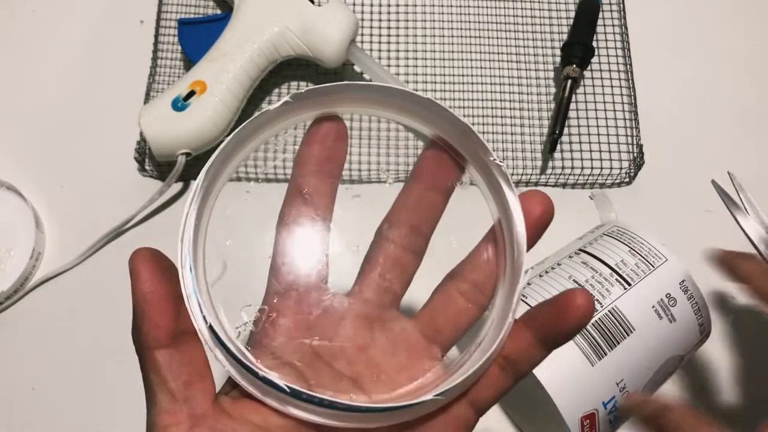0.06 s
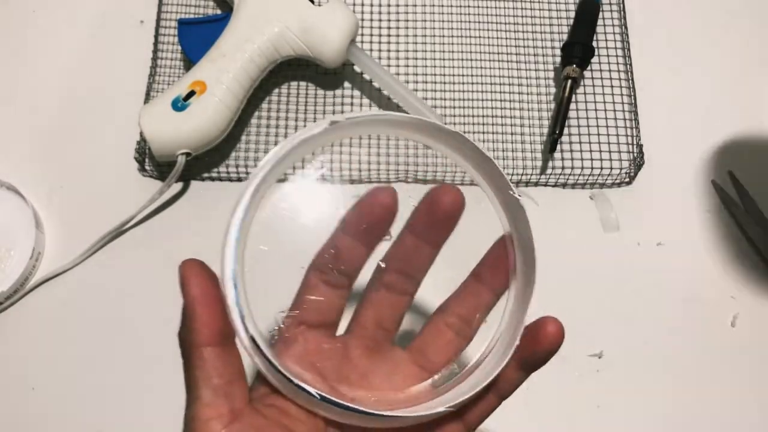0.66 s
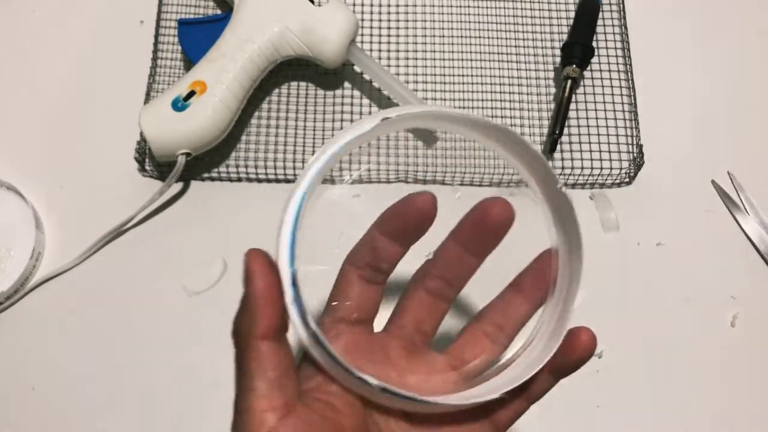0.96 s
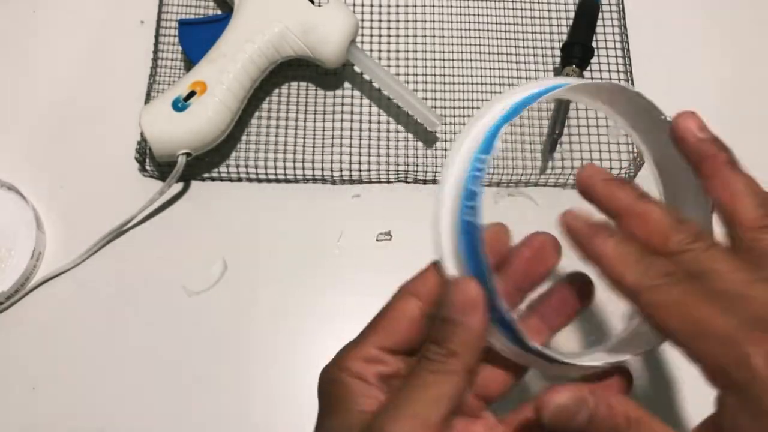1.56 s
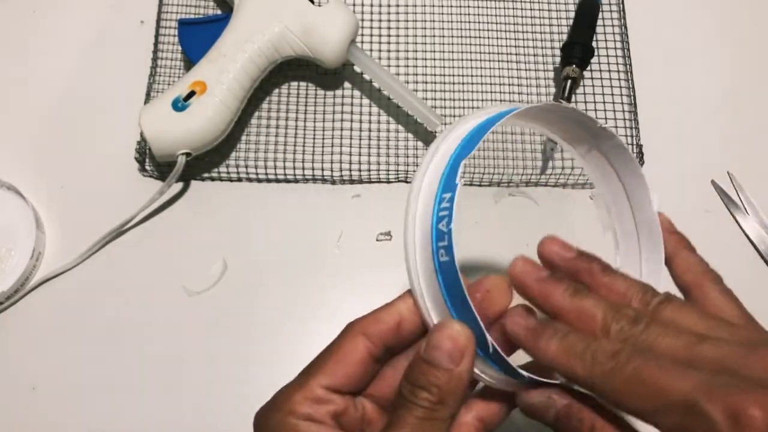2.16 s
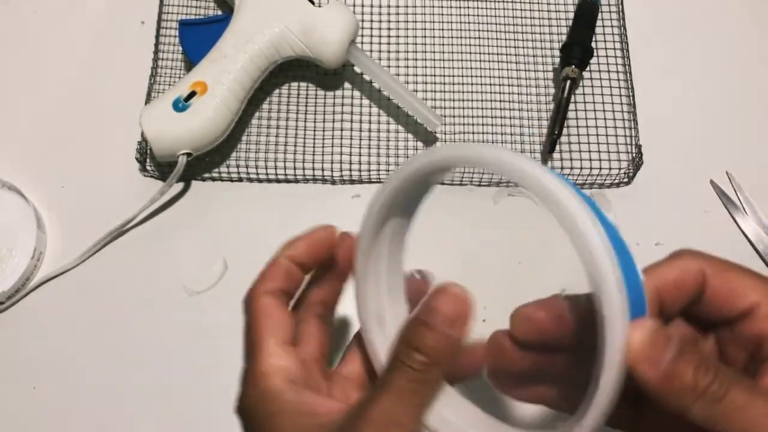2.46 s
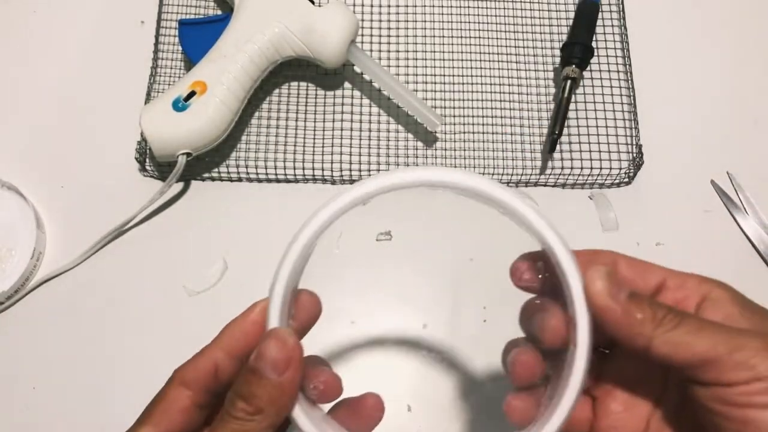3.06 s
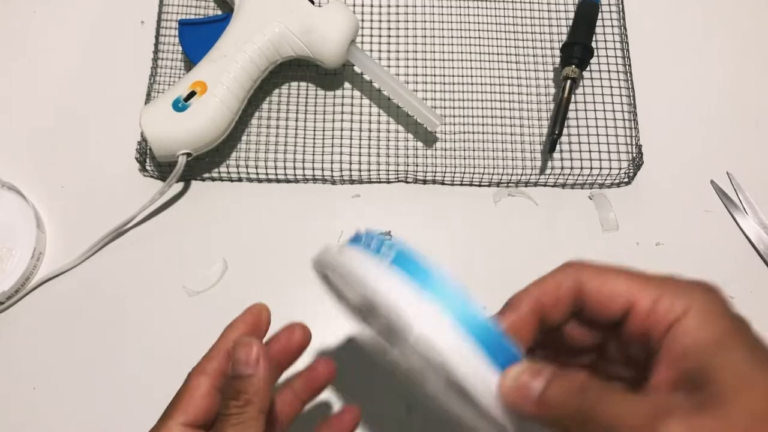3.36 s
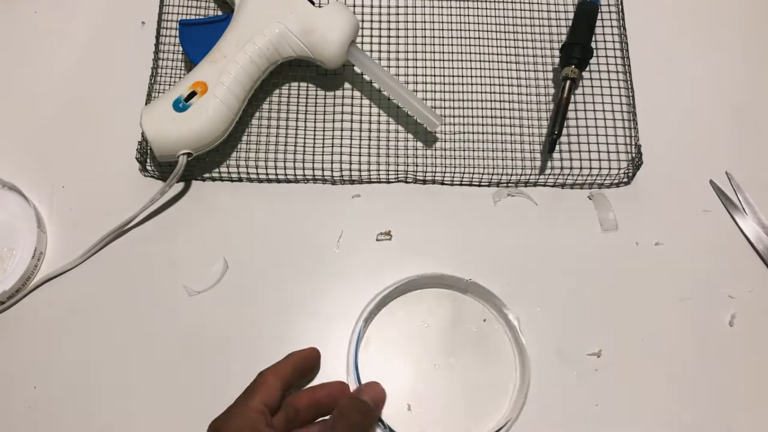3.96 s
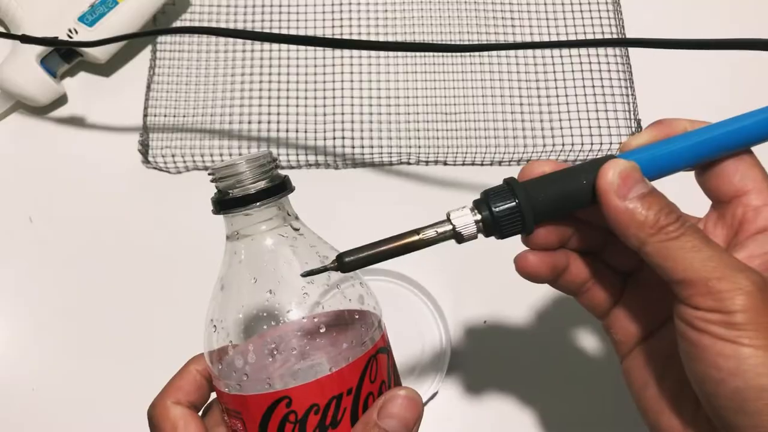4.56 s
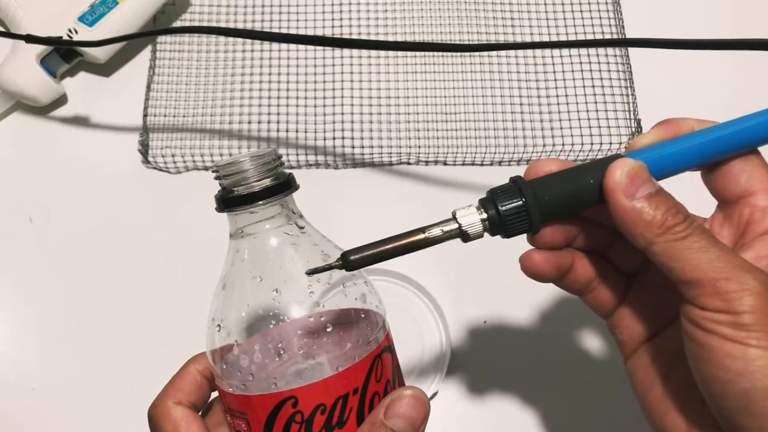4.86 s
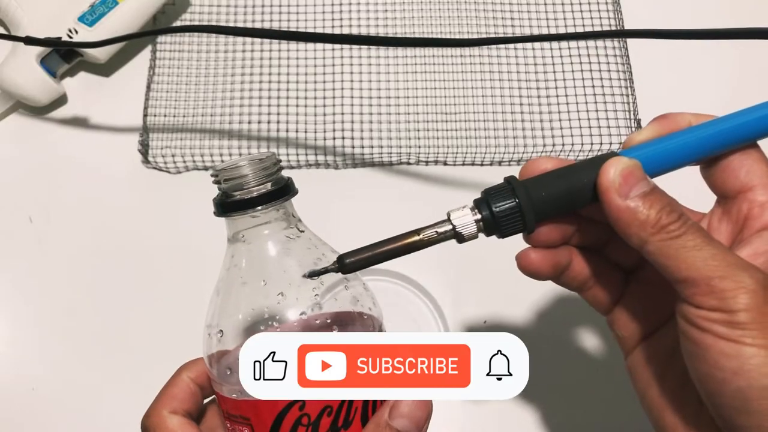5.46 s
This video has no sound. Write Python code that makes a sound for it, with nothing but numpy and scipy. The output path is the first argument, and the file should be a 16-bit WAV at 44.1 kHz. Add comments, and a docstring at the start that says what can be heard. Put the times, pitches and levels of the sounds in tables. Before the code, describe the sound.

A paper label slides over a table with a few soft rustles in the first half second. Just before 1 second, the film stretched across the rim of a plastic tub snaps with a hollow pop, like a small drum quickly damped, and crinkles faintly. From about 1.3 to 2.8 seconds, fingers rub unevenly around the stiff ring, with hissy strokes, light ticks and small knocks, the clearest near 2.4 seconds, followed by a tiny chirp of skin. A few more strokes come around 3.3 seconds. At 3.7 seconds the ring lands on the table with a sharp rocking clack, the loudest sound, then a softer clack at 4 seconds. Faint ticks follow until about 5 seconds. The microphone is close, in a small room with short reverberation, soft air noise, mains hum and a thin whine that grows slightly near 4.4 seconds.

```python
"""A table in a small room, one microphone close to hands working on the cut-off rim of a plastic tub.
A paper label slides aside, rustling. The clear film stretched across the rim snaps and rings like a
small drum: a hollow pop. Fingers rub and click round the rim, exciting its stiff modes, then the ring
is set down with two rocking clacks. Behind: short reverberation, air, mains hum and a faint whine."""
import sys
import numpy as np
from scipy import signal
from scipy.fft import rfft, irfft
from scipy.io import wavfile

SR = 44100
rng = np.random.default_rng(int(sys.argv[2]) if len(sys.argv) > 2 else 0)


def store_wav(level_fs):
    """Save 16-bit WAV to argv[1]."""
    pcm = np.round(np.clip(np.atleast_2d(level_fs), -1, 1) * 32767)
    wavfile.write(sys.argv[1], SR, pcm.T.astype(np.int16))


N = 247385
TIME = np.arange(N) / SR
POP_S = 0.9526

# modes of the stiff rim: f/Hz, relative level/dB, t60/s before the fingers damp them
RIM_MODES = [(923, 4, 0.006), (1051, -1, 0.039), (1183, -8.5, 0.045), (1617, 2, 0.011), (1830, -6, 0.026),
             (1945, -2, 0.0088), (2394, 2.5, 0.0094), (2640, 1.5, 0.006), (2893, -3, 0.02),
             (3357, -2, 0.011), (3860, 1.5, 0.0044), (4290, -3.5, 0.015), (4665, 0.5, 0.0067),
             (5860, 1, 0.0058), (7150, -2, 0.0078), (8540, 4, 0.0024), (9450, -9, 0.005),
             (12200, -21, 0.0056)]
# the ring lands on one edge and rocks onto the other:
# t/s, level/dB, centre f/Hz, skid/s, rocking time/s, other edge level/dB
LANDINGS = [(3.6824, -17.5, 1780, 0.001, .0023, -33.5), (4.0185, -29.5, 2480, 0.011, .0055, -37)]
# low modes of the whole ring on the table: f/Hz, level for an average landing/dB, t60/s
RING_MODES = [(175, -49, 0.057), (345, -37.5, 0.031), (456, -30, .02), (598, -36.5, 0.022)]
# fingers knock and flex the held ring: t/s, click level/dB, click f/Hz, flex level/dB, flex f/Hz
KNOCKS = [(1.373, -51, 3100, -36, 370), (1.5684, -42, 1230, -33.5, 410), (1.732, -44.5, 1300, -53, 356),
          (2.366, -43.5, 4960, -42, 197), (2.4427, -31, 2490, -34, 484), (2.534, -43.5, 3250, -41, 536)]
# light ticks on plastic, the last ones faint and high: t/s, level/dB, centre f/Hz
PLASTIC_TICKS = [(1.037, -47, 2030), (1.07, -47.5, 1970), (1.385, -58, 1510), (1.589, -41, 4170),
                 (1.755, -45, 4440), (2.2837, -39.5, 4840), (2.307, -47.5, 1710), (2.383, -45, 3400),
                 (2.398, -45.5, 2820), (2.597, -47.5, 2480), (3.2659, -46, 4260), (3.556, -54.5, 3030),
                 (3.61, -45.5, 3300), (4.2624, -53.5, 4900), (4.35, -59.5, 4740), (4.925, -62.5, 8200),
                 (5.0504, -58.5, 8200)]
# sticking skin lets go and the rim chirps at one pitch: t/s, level/dB, skid/s
SKIN_CHIRPS = [(2.484, -38.5, .008), (3.9196, -40.5, 0.00064)]
# drum modes of the stretched film: f/Hz, level/dB, t60/s
FILM_MODES = [(138, -50.5, 0.44), (168, -35, 0.16), (252, -38.5, 0.57), (304, -39.5, 0.9),
              (363, -41.5, 0.69), (422, -29, 0.11), (464, -36, 0.33), (510, -27.5, 0.4)]
# fingers travelling round the rim, one list a turn: t/s, relative level/dB
RUB_TURNS = [
    [(1.15, -87), (1.35, -58), (1.482, -59.5), (1.692, -63), (1.766, -58.5), (1.99, -66.5), (2.1, -69)],
    [(2.1, -85), (2.248, -62.5), (2.404, -61.5), (2.604, -61.5), (2.748, -66.5), (2.88, -94)],
    [(3.18, -78), (3.45, -93)],
]
# spectrum of skin rubbing on plastic: f/Hz, gain/dB
RUB_COLOUR = [(590, -3.5), (1000, -5.5), (1400, -12.5), (2150, -10), (2810, 4.5), (4310, -4.5), (4620, -6),
              (6040, -3), (7100, -7.5), (14200, -17), (16000, -20)]
# broad hollows that colour all rubbing on the ring: f/Hz, width/Hz, mean gain/dB
HOLLOWS = [(1535, 310, 12.5), (2610, 520, -6), (4000, 500, -1), (5800, 1700, -16)]
# short strokes of skin: peak t/s, length/s, hiss level/dB, hiss f/Hz, bowed flex level/dB
STROKES = [(1.396, 0.015, -51.5, 1650, -76), (1.533, .025, -52.5, 4380, -66),
           (1.74, 0.04, -50.5, 4000, -63), (1.87, 0.022, -57, 4070, -77), (2.211, 0.02, -59.5, 4450, -68),
           (2.288, 0.016, -48.5, 4750, -67), (2.719, 0.027, -57.5, 6200, -71),
           (2.761, 0.016, -48, 4200, -58.5), (3.274, 0.027, -47.5, 4000, -57.5),
           (3.324, 0.018, -56, 2300, -63), (3.363, 0.015, -51, 4000, -71), (3.634, .025, -48.5, 3050, -66),
           (3.966, 0.022, -61, 2770, -65), (4.375, 0.0052, -58, 4740, -84)]
# the label slides on the table: peak t/s, fall/s, rustle level/dB, rustle f/Hz, drone level/dB, f/Hz
LABEL_SLIDES = [(.005, 0.081, -48.5, 1500, -55.5, 300), (.265, 0.12, -65, 3900, -57.5, 480),
                (0.429, 0.043, -55, 2570, -68, 550)]
# decay of the room's tail: f/Hz, t60/s
ROOM_T60 = [(150, 0.85), (500, 0.59), (1500, 0.55), (4000, 0.53), (8000, 0.24), (16000, 0.64)]
# colour of the room's reflections: f/Hz, gain/dB
ROOM_COLOUR = [(100, 5.5), (400, 7.5), (1000, 2.5), (2500, -4.5), (5000, -3), (9000, -4), (16000, -20)]
# air of the still room: f/Hz, relative level/dB
AIR_COLOUR = [(15, -50), (25, -32), (49, -1), (117, -2.5), (149, -5), (236, -10), (309, -9), (344, -10.5),
              (531, -17.5), (1020, -15), (2610, -24), (2990, -23), (3430, -26), (5880, -32), (16000, -47)]
# mains hum and faint steady bands above it: f/Hz, width/Hz, level/dB
ROOM_TONES = [(123.5, 2.4, -70.5), (1094, 280, -79.5), (3044, 230, -77.5), (4870, 100, -86.5),
              (5960, 1000, -81.5)]
# a thin whine that grows stronger late on: t/s, level/dB
WHINE_LEVELS = [(0, -75), (4.38, -79), (4.46, -72.5), (5.6, -76)]


def rim_clicks(shell_db=-2, shell_t60=0.038, crack_db=-14, crack_t60=0.0058, held_t60=0.03):
    """Each push and skid rings the finger-damped rim; gives the sound at the microphone and all round."""
    near, radiated, t = np.zeros(N), np.zeros(N), TIME[:SR // 12]
    push = signal.unit_impulse(len(t))
    modes = sum((-1) ** k * mode(t, hz, db, min(t60, held_t60))
                for k, (hz, db, t60) in enumerate(RIM_MODES))
    for s, db, edges, skid_s in contacts():
        skid, shell, crack = rng.standard_normal((3, len(t)))
        force = push + unit_energy(skid * np.exp(-t / skid_s))
        ringing = unit_energy(signal.fftconvolve(force, modes)[:len(t)])
        # between the clear modes lie many crowded, quickly damped ones
        body = ringing + from_db(shell_db) * unit_energy(shell * dying(t, shell_t60))
        # hard plastic cracks in the treble, the more so the harder the blow
        snap = from_db(crack_db + 0.24 * db) * unit_energy(band(crack * dying(t, crack_t60), 6900, 14200))
        size = from_db(db) * np.sqrt(0.004 * SR)   # level counts as energy spread over 4 ms
        add(near, s, size * (unit_energy(band(body, *edges)) + snap))
        # summed over all directions, the peaks of the modes even out
        add(radiated, s, size * (unit_energy(band(push, *edges)) + snap))
    return near, radiated


def contacts(catches_per_s=22, catch_hz=3620, tick_octaves=1.94, tick_skid_s=0.0055):
    """Every contact that rings the plastic: t/s, level/dB, band edges/Hz, skid/s."""
    yield POP_S - 0.0084, -30, around(4170, 1.8), 0.005   # the film tears loose,
    yield POP_S - 0.002, -30, around(6200, 0.89), 0.0043   # snaps
    yield POP_S, -28, around(2800, 3.8), 0.0059   # and slaps the rim
    for s, db, hz, skid_s, rock_s, other_db in LANDINGS:
        yield s, db, around(hz, 1.73), skid_s   # one edge lands,
        yield s + rock_s, other_db, around(2440, 2.9), 0.0018   # the other follows,
        yield s + 0.013, -37.5, around(1110, 2.9), 0.021   # the ring shuffles to rest
    for s, db, hz, _, _ in KNOCKS:
        yield s, db, around(hz, 2.4), 0.0014
    for s, db, hz in PLASTIC_TICKS:
        yield s, db, around(hz, tick_octaves), tick_skid_s
    for s, db, skid_s in SKIN_CHIRPS:
        yield s, db, around(2840, 0.44), skid_s
    # a sliding finger catches at random, louder the harder it rubs
    pressure = rub_pressure()
    for i in np.flatnonzero((rng.random(N) < catches_per_s / SR) & (pressure > 0)):
        size, pitch = rng.uniform(-1, 1, 2)
        db = 20 * np.log10(pressure[i]) - 2.5 + 2 * size
        yield i / SR, db, around(catch_hz * 2 ** pitch, tick_octaves), tick_skid_s


def ring_thuds(rise_s=0.00041, flex_lag_s=0.00094, flex_cycles=7.4):
    """The ring flexes against hand or table and is damped at once."""
    out, t = np.zeros(N), TIME[:SR // 5]
    onset = 1 - np.exp(-t / rise_s)
    for s, _, _, db, hz in KNOCKS:
        add(out, s + flex_lag_s, onset * mode(t, hz, db, flex_cycles / hz))
    body = onset * sum(mode(t, hz, db, t60) for hz, db, t60 in RING_MODES)
    average_db = np.mean([row[-1] for row in LANDINGS])
    for s, _, _, _, rock_s, other_db in LANDINGS:
        add(out, s + rock_s, from_db(0.97 * (other_db - average_db)) * body)
    return out


def film_pop(rise_s=0.00095, free_s=0.034, damped_t60=0.0086):
    """The film snaps through and its low modes ring until the fingers still it."""
    out, t = np.zeros(N), TIME[:SR // 2]
    envelope = (1 - np.exp(-t / rise_s)) * dying(np.maximum(t - free_s, 0), damped_t60)
    add(out, POP_S, envelope * sum(mode(t, hz, db, t60) for hz, db, t60 in FILM_MODES))
    return out


def film_crinkle(rise_s=0.0027):
    """The film crinkles as it slackens after the pop."""
    grain = friction(per_s=2200, spread_db=3, hiss=0.86)
    return slide(grain, POP_S + 2 * rise_s, rise_s, fall_s=0.11, db=-48.5, edges=around(2600, 1.7))


def finger_strokes(flex_hz=333.6, fall_over_rise=1.35):
    """Each stroke hisses on the plastic and bows the ring's low flex."""
    grain = friction(per_s=2000, spread_db=1.5, hiss=0.59, hollows=HOLLOWS)
    out, skew = np.zeros(N), np.sqrt(fall_over_rise)
    for s, length_s, hiss_db, hiss_hz, flex_db in STROKES:
        rise_s, fall_s = length_s / skew, length_s * skew
        out += slide(grain, s, rise_s, fall_s, hiss_db, around(hiss_hz, 2.06))
        out += slide(grain, s, rise_s, fall_s, flex_db, around(flex_hz, 0.51))
    return out


def finger_rub(gain_db=2, flutter_db=2, flutter_hz=45):
    """Skin drags along the plastic with an unsteady grip."""
    grip = from_db(gain_db + flutter_db * wander(flutter_hz))
    slips = friction(per_s=1300, spread_db=2.5, hiss=0.9, hollows=HOLLOWS)
    return rub_pressure() * grip * rms_one(coloured(slips, RUB_COLOUR))


def rub_pressure():
    """How hard the fingers drag at each moment, as a gain."""
    turns = map(np.transpose, RUB_TURNS)
    return sum(np.interp(TIME, times, from_db(db), left=0, right=0) for times, db in turns)


def paper_label(rise_s=0.017):
    """Each slide starts with a jerk and dies away: a rustle, and a low drone from the table top."""
    grain = friction(per_s=2500, spread_db=0.5, hiss=0.75)
    return sum(slide(grain, s, rise_s, fall_s, rustle_db, around(rustle_hz, 1.83))
               + slide(grain, s, rise_s, fall_s, drone_db, around(drone_hz, 0.82))
               for s, fall_s, rustle_db, rustle_hz, drone_db, drone_hz in LABEL_SLIDES)


def room_echoes(x, early_db=-10, early_t60=0.17, late_db=-12, gap_s=0.004, build_s=0.0032):
    """Quick reflections from the table and near things, then a tail that lasts longest in the bass."""
    out, t = np.zeros(N), TIME[:round(0.7 * SR)]
    edges = np.geomspace(70, 18000, 9)
    white = rng.standard_normal((2, len(t)))
    late = sum(band(white[k % 2], low, high) * dying(t, at_hz(ROOM_T60, np.sqrt(low * high)))
               for k, (low, high) in enumerate(zip(edges, edges[1:])))
    late *= 1 - np.exp(-t / build_s)
    early = rng.standard_normal(len(t)) * dying(t, early_t60)
    echoes = from_db(early_db) * unit_energy(early) + from_db(late_db) * unit_energy(late)
    fade = np.minimum(1, 2 * (1 - t / t[-1]))
    add(out, gap_s, signal.fftconvolve(x, coloured(echoes, ROOM_COLOUR) * fade))
    return out


def room_tone(air_db=-59, whine_hz=2962):
    """Soft air noise with mains hum and a thin electrical whine."""
    air = from_db(air_db) * rms_one(coloured(rng.standard_normal(N), AIR_COLOUR))
    tones = sum(from_db(db) * narrow_noise(hz, width_hz) for hz, width_hz, db in ROOM_TONES)
    whine_gain = from_db(np.interp(TIME, *np.transpose(WHINE_LEVELS)))
    return air + tones + whine_gain * narrow_noise(whine_hz, width_hz=22)


def friction(per_s, spread_db, hiss, hollows=(), shift_db=6, shift_hz=14):
    """Tiny uneven slips over a smooth hiss, lifted by any hollows, which shift with the grip; rms 1."""
    sizes = from_db(spread_db * np.minimum(rng.exponential(1, N), 4)) * rng.choice([-1, 1], N)
    slips = sizes * (rng.random(N) < per_s / SR)
    drag = rms_one(slips) + hiss * rng.standard_normal(N)
    resonance = np.zeros(N)
    for hz, width_hz, db in hollows:
        gain = from_db(db + shift_db * wander(shift_hz))
        resonance += gain * signal.lfilter(*signal.iirpeak(hz, hz / width_hz, fs=SR), drag)
    return rms_one(drag + resonance)


def slide(grain, s, rise_s, fall_s, db, edges):
    """A band of friction that swells as the grip tightens and then eases off."""
    out = np.zeros(N)
    inside = (TIME > s - 2 * rise_s) & (TIME < s + 2 * fall_s)
    t = TIME[inside] - s
    swell = np.exp(-(t / np.where(t < 0, rise_s, fall_s)) ** 2)
    out[inside] = from_db(db) * swell * rms_one(band(grain[inside], *edges))
    return out


def mode(t, hz, db, t60):
    """A struck resonance."""
    return from_db(db) * np.sin(2 * np.pi * hz * t) * dying(t, t60)


def dying(t, t60):
    """Falls 60 dB in t60 seconds."""
    return np.exp(-np.log(1000) * t / t60)


def narrow_noise(centre_hz, width_hz):
    """A tone that wavers the faster the wider it is; rms 1."""
    hz = np.fft.rfftfreq(N, 1 / SR)
    peak = 1 / (1 + (2 * (hz - centre_hz) / width_hz) ** 2)
    return rms_one(irfft(peak * rfft(rng.standard_normal(N)), N))


def wander(rate_hz):
    """Smooth random motion; rms 1."""
    lowpass = signal.butter(2, rate_hz, fs=SR, output="sos")
    return rms_one(signal.sosfilt(lowpass, rng.standard_normal(N)))


def around(centre_hz, octaves):
    """Low and high edge of a band."""
    return centre_hz * 2 ** (-octaves / 2), centre_hz * 2 ** (octaves / 2)


def band(x, low_hz, high_hz):
    """Causal band-pass."""
    high_hz = min(high_hz, 0.45 * SR)
    low_hz = min(low_hz, 0.95 * high_hz)
    return signal.sosfilt(signal.butter(2, [low_hz, high_hz], "band", fs=SR, output="sos"), x)


def coloured(x, spectrum):
    """Shape a signal with a smooth spectrum."""
    gain = from_db(at_hz(spectrum, np.fft.rfftfreq(len(x), 1 / SR)))
    return irfft(rfft(x) * gain, len(x))


def at_hz(points, hz):
    """Read a table on a log-frequency axis."""
    known_hz, values = np.transpose(points)
    return np.interp(np.log(np.maximum(hz, 1)), np.log(known_hz), values)


def from_db(db):
    """Decibels to gain."""
    return 10 ** (np.asarray(db) / 20)


def rms_one(x):
    """Scale to unit rms."""
    return x / np.sqrt(np.mean(x ** 2) + 1e-20)


def unit_energy(x):
    """Scale to a total energy of one."""
    return x / np.linalg.norm(x)


def add(out, s, sound):
    """Mix a sound in at s seconds."""
    start = max(0, round(s * SR))
    out[start:start + len(sound)] += sound[:N - start]


def scene(pop_send_db=-8, rub_send_db=-1):
    """Handling close to the microphone, the room's reflections and steady tone behind; mono."""
    clicks, radiated = rim_clicks()
    thuds, pop = ring_thuds(), film_pop()
    rubbing = paper_label() + film_crinkle() + finger_strokes() + finger_rub()
    echoes = room_echoes(radiated + thuds + from_db(pop_send_db) * pop + from_db(rub_send_db) * rubbing)
    return (clicks + thuds + pop + rubbing + echoes + room_tone())[None]


def record(dry):
    """The microphone loses the bass below 40 Hz and the top above 16 kHz."""
    low_cut = signal.butter(2, 40, "high", fs=SR, output="sos")
    high_cut = signal.ellip(10, 0.2, 70, 16000, fs=SR, output="sos")
    return signal.sosfilt(high_cut, signal.sosfilt(low_cut, dry))


dry = scene()
out = record(dry)
store_wav(out)
```